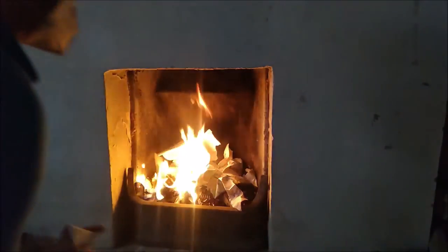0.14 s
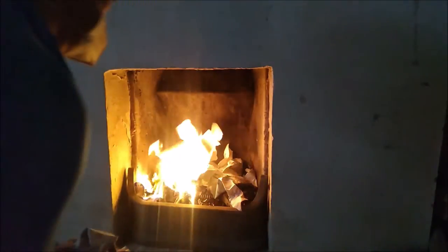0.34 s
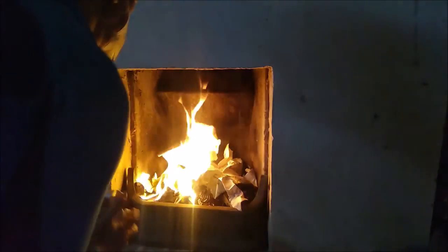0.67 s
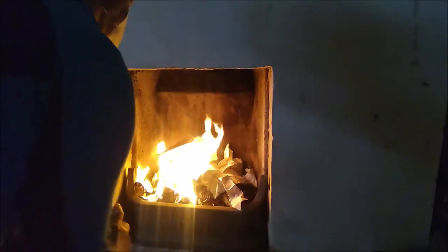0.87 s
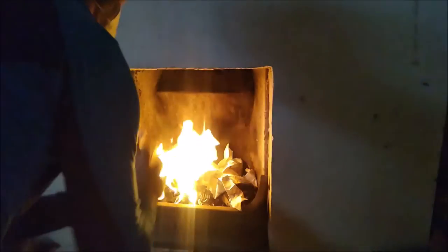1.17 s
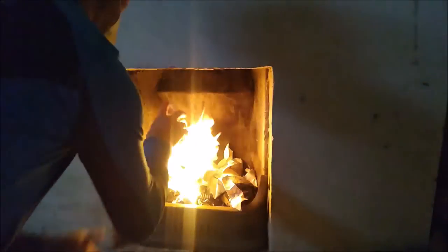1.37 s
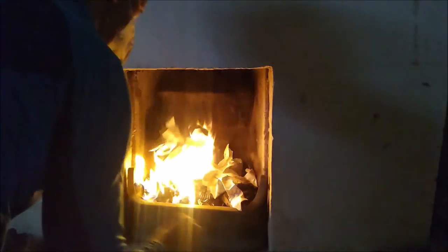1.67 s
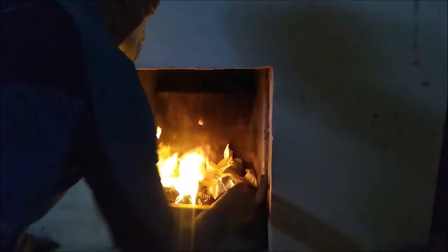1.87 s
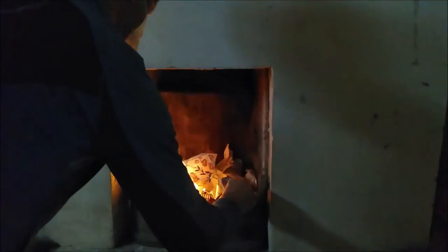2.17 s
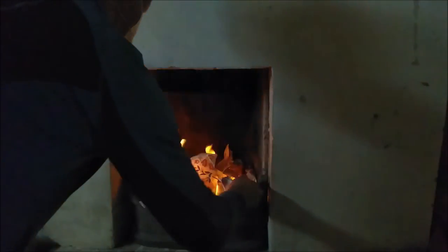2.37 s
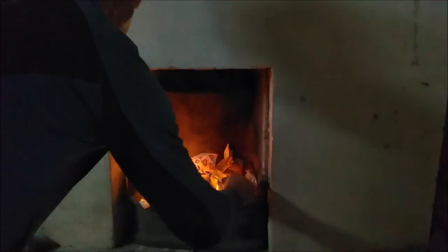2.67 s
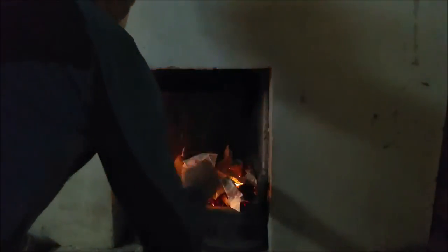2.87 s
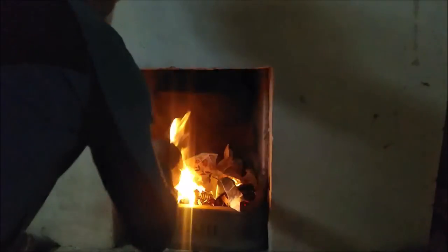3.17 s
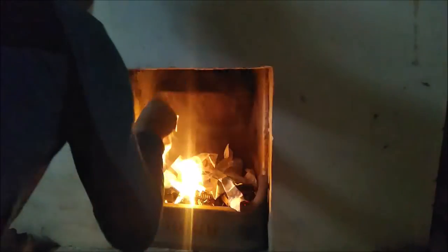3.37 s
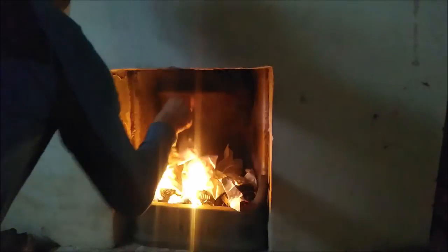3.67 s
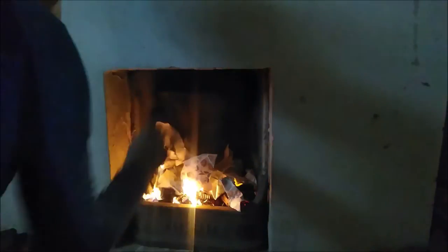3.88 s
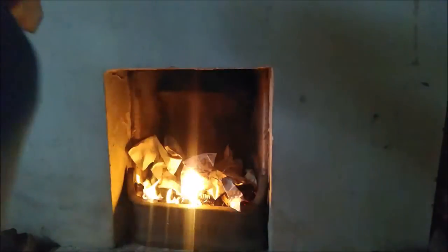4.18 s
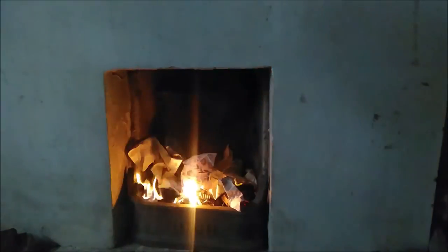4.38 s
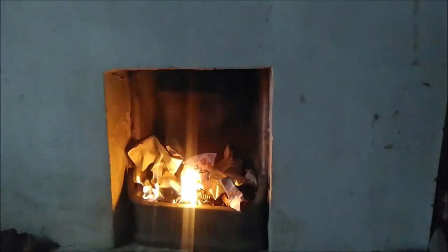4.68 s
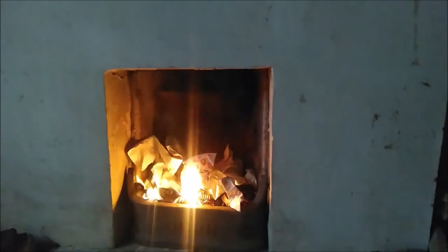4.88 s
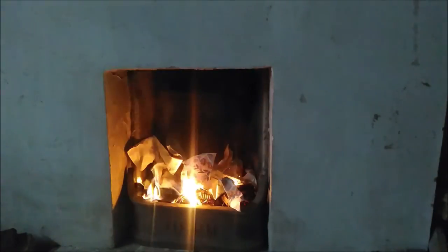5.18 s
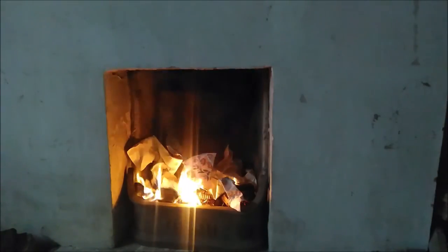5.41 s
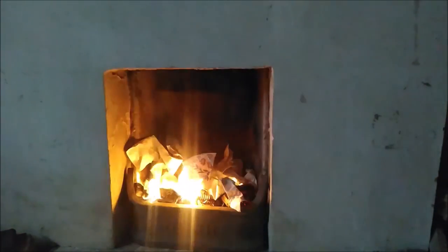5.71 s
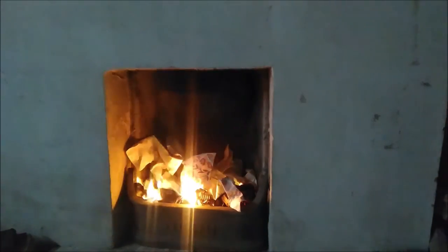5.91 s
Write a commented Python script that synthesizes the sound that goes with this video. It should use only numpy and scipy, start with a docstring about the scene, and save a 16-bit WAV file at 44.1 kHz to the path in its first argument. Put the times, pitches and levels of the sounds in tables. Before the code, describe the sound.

From 0 to about 1.1 s, crumpled paper crinkles loudly and densely in overlapping squeezes, with crisp snaps around 0.1, 0.3, 0.4 and a cluster at 0.65-0.73 s, plus low body shuffling. It then thins; a short crunch and snap come at 1.5 s with a soft thud near 1.6 s. From 1.8 to 2.4 s there are quieter rustles and hollow, low scrapes of the pile. At 2.5 s a hard knock cracks, bounces almost at once, and rings grate and firebox for about half a second. Another drag follows at 2.7 s. Light sleeve swishes and snaps come around 3.2 s, a brief rustle and thud at 3.8 s, tiny snaps near 4.3 s and a soft swish at 4.9 s. After a lull, duller crinkling and soft thuds return from 5.6 s to the end. Faint high hiss, room air and low hum persist; the room echoes briefly.

```python
"""Crumpled paper pushed into a small fireplace

A bare room, one microphone: someone crouches, pushes paper into the burning pile, then steps away.
Paper crinkles in dense clicks and snaps in short noise bursts; one knock rings modes of grate and firebox.
The pile scrapes as narrow noise, sleeves swish in fine clicks, feet thud as decaying sines.
A faint, unsteady high hiss of fine clicks lies under it all, with filtered-noise air and a low hum."""
import sys
import numpy as np
from scipy import signal
from scipy.fft import rfft, irfft, next_fast_len
from scipy.io import wavfile
from scipy.ndimage import map_coordinates

SR = 44100
rng = np.random.default_rng(int(sys.argv[2]) if len(sys.argv) > 2 else 0)


def wav_record(signal):
    """Record a signal, one row per channel, as 16-bit PCM in the file named by sys.argv[1]."""
    frames = np.transpose(np.atleast_2d(signal))
    bounded = np.clip(frames, -1, 1)
    # unit amplitude maps onto the largest positive 16-bit level
    quanta = np.round(bounded * 32767).astype(np.int16)
    wavfile.write(sys.argv[1], SR, quanta)


N = 266805
TIME = np.arange(N) / SR

# squeezes of the paper; treble and low middle are against level_db:
# start_s, rise_s, hold_s, level_db, treble_db, low_middle_db
SQUEEZES = [(0, 0.0017, .035, -43, -0.5, -2.5), (0.065, 0.028, .02, -43, -3.5, 0),
            (.175, 0.12, .03, -41.5, 3, -2.5), (0.374, 0.026, .03, -44, -6, -2),
            (0.428, 0.16, .05, -42, -4.5, -5), (0.597, 0.073, .1, -43, -1, -1),
            (0.79, 0.047, .2, -49, -3.5, -19), (1.038, 0.05, .04, -47.5, -1.5, -14),
            (1.193, 0.074, .08, -60, -21, -43), (1.352, 0.014, .09, -51.5, -3.5, -15),
            (1.5, 0.029, .01, -49, -19, -2), (1.531, 0.0032, 0.012, -43.5, -28, -5),
            (1.66, 0.015, .03, -58, -1.5, -2), (1.774, 0.004, .36, -54.5, 0.5, -6),
            (2.17, 0.0069, 0.0092, -57, 7, -4.5), (2.205, .025, 0.013, -51.5, 2, -3),
            (2.282, .015, .04, -57, -9.5, -4), (2.37, 0.1, .04, -57.5, -1.5, -7),
            (2.808, 0.019, .01, -63.5, -4.5, -16), (3.694, 0.036, .04, -61, 2.5, -25),
            (3.765, 0.016, .05, -49, -2, -5), (3.864, 0.034, .03, -62, 5, 2),
            (3.985, 0.033, 0.029, -82, 15.5, -17), (5.55, .13, 0.069, -56, -11, -15.5),
            (5.677, 0.15, .08, -49.5, -6.5, -6), (5.92, 0.1, .08, -55.5, -4, -10)]
# spectrum of the crinkling paper: frequency_hz, level_db
PAPER_SPECTRUM = [(290, -34), (500, -13), (819, -11.5), (919, -7.5), (1020, -3), (1160, -1.5), (1600, 0),
                  (2770, -1.5), (4940, -3.5), (6330, -6), (12100, -9.5), (15100, -15.5), (16000, -19.5)]
# creases that snap, peak before the echo: start_s, peak_db, treble_db, sheet_pitch_hz
SNAPS = [(0.099, -21, -6, 920), (0.293, -18.5, -3, 1570), (0.404, -26, -3, 1012), (0.639, -22.5, -18, 2310),
         (.659, -24.5, -28, 975), (0.724, -19.5, -38, 1534), (0.729, -20.5, -36, 1190),
         (1.518, -36, -1, 1630), (1.536, -21, -6.5, 1110), (1.778, -37.5, -21, 1290),
         (1.832, -34.5, -3.5, 1190), (3.199, -41.5, 4, 1702), (3.227, -31, 6, 1897),
         (3.772, -32, -7.5, 1240), (3.785, -30.5, -12.5, 2550), (3.898, -33, 6, 2500),
         (4.26, -37, 3.5, 2370), (4.271, -36, -16, 1730), (4.318, -33, -2.5, 1765), (4.337, -38.5, 6, 2034),
         (5.882, -33, -11.5, 1129)]
# spectrum of a snapping crease: frequency_hz, level_db
CREASE_SPECTRUM = [(120, -26), (300, -7.5), (750, -5.5), (1100, -1), (2000, 2.5), (3500, -2), (6000, -3.5),
                   (9000, -5), (15500, -15)]
# contacts of the knock on the grate, against each other: start_s, level_db
KNOCK_CONTACTS = [(2.4961, 2.5), (2.4979, -5.5), (2.5147, -22)]
# spectrum of the knock's crack: frequency_hz, level_db
KNOCK_SPECTRUM = [(35, -41), (60, -24), (110, -26.5), (250, -12), (400, -7.5), (580, -10), (785, -13.5),
                  (1280, -7.5), (1800, -9.5), (2600, -12), (4000, -13), (6200, -11.5), (8000, -19.5),
                  (15500, -27.5)]
# ringing of grate and firebox, levels against each other: pitch_hz, level_db, t60_s
GRATE_MODES = [(137.3, -11.5, 0.82), (169, -11, 0.35), (224.8, 2.5, 0.18), (248.6, 1.5, 0.27),
               (306, -14.5, 0.37), (311, -7, 0.51), (472, -6.5, .33), (550, -8, .27), (590, -4.5, 0.48),
               (1376, -11, 0.14), (1634, -5.5, 0.44), (1900, -10, 0.32), (2020, -5.5, 0.27),
               (2482, -2.5, 0.28), (2990, -13, 0.36)]
# spectrum of the air in the firebox: frequency_hz, level_db
BOOM_SPECTRUM = [(35, -27), (60, -17.5), (100, -15), (130, -9), (250, 6.5), (480, -10), (700, -17.5),
                 (1500, -35.5)]
# shifts of the body and the pile; bass is against level_db: start_s, rise_s, hold_s, level_db, bass_db
SHIFTS = [(0, 0.0024, 0.013, -47.5, 1), (0.058, 0.018, 0.12, -50, -11), (0.262, 0.015, 0.06, -50, -34),
          (0.38, 0.031, 0.028, -47.5, -16), (0.48, 0.016, 0.35, -63.5, -72), (1.13, .03, .02, -66.5, -8),
          (1.358, 0.026, 0.11, -78.5, 14), (1.506, 0.043, 0.047, -59, 2.5),
          (1.763, 0.024, 0.11, -63, -12.5), (2.017, .04, 0.052, -66.5, 2.5),
          (2.176, 0.039, 0.072, -60.5, 6), (2.919, 0.021, 0.0064, -79, 3.5), (3.435, 0.019, 0.009, -90, 22),
          (3.561, 0.091, .06, -86.5, 17), (3.756, 0.036, 0.044, -52, -5), (3.928, 0.015, .02, -64.5, -2),
          (5.658, 0.018, 0.038, -57.5, -7), (5.723, 0.036, 0.19, -58.5, -35)]
# spectrum of the shifting body: frequency_hz, level_db
SHUFFLE_SPECTRUM = [(59, -44.5), (100, -27), (124, -11), (178, -23), (237, -1.5), (321, -6.5), (416, -2.5),
                    (777, -3.5), (860, -12.5), (900, -1.5), (1170, -23.5), (1980, -120)]
# drags of the pile over the grate: start_s, rise_s, hold_s, level_db, hollow_pitch_hz
DRAGS = [(1.78, 0.043, 0.098, -61.5, 398.6), (1.969, 0.1, 0.02, -53, 440), (2.154, 0.046, .03, -50, 470),
         (2.31, 0.12, 0.18, -56.5, 418), (2.712, 0.021, 0.052, -50.5, 377.7),
         (2.9, 0.035, 0.019, -68.5, 322), (3.543, 0.057, .03, -72, 482), (3.686, 0.023, 0.011, -62, 433),
         (3.943, 0.038, 0.012, -61, 382)]
# soft thuds of feet and knees, level before the swell and room: start_s, level_db, pitch_hz, t60_s
THUDS = [(1.585, -39.5, 283.7, 0.21), (1.598, -54, 195, 0.17), (2.19, -49, 529, 0.3),
         (2.225, -41.5, 248, 0.3), (3.80, -39, 404, 0.082), (5.672, -44.5, 225.5, 0.23),
         (5.718, -45.5, 631, 0.16), (5.838, -40.5, 273, 0.21), (5.86, -40.5, 242, 0.15)]
# swishes of sleeves; treble and the ring of the folds are against level_db:
# start_s, rise_s, hold_s, level_db, treble_db, fold_pitch_hz, fold_ring_db
SWISHES = [(3.185, 0.05, 0.026, -61, 2, 1730, 5.5), (3.269, 0.033, 0.017, -50.5, -4.5, 1672, 1),
           (3.366, 0.064, 0.031, -69, -8.5, 1710, -21), (3.483, .03, .09, -78.5, -11, 1690, -18),
           (4.149, 0.022, .02, -80.5, 13, 1553, 4), (4.247, 0.024, 0.01, -59.5, 5, 1670, 7),
           (4.303, 0.022, 0.017, -58.5, -14, 1787, 0), (4.55, 0.21, 0.13, -74, 3, 1997, -0.5),
           (4.878, 0.073, 0.051, -54, -7.5, 1295, -11), (5.071, 0.012, 0.021, -61.5, 2.5, 1996, -8),
           (5.151, .04, .12, -85, -19, 2030, 11)]
# spectrum of sleeve cloth: frequency_hz, level_db
SLEEVE_SPECTRUM = [(600, -29.5), (950, -9.5), (1400, -2.5), (2400, 1), (3000, -1.5), (4300, -1),
                   (6500, -5.5), (11000, -7), (15500, -15.5)]
# spectrum of the faint high hiss: frequency_hz, level_db
HISS_SPECTRUM = [(700, -23), (1500, -0.5), (2200, 1.5), (4200, -4), (6500, -9.5), (11000, -8.5),
                 (15500, -14.5)]
# spectrum of the still room air: frequency_hz, level_db
AIR_SPECTRUM = [(20, -28.5), (35, -18.5), (50, -4.5), (78, -4.5), (110, -17.5), (250, -16), (500, -21),
                (750, -25.5), (1300, -33), (4000, -34.5), (6000, -41.5), (12000, -49.5), (16000, -59)]
# first reflections off firebox, hearth and wall, against the direct sound: mean_delay_s, gain
NEAR_WALLS = [(.0021, 0.23), (.0037, -0.077), (.0058, 0.18), (.0083, -0.054)]
# decay time of the room: frequency_hz, t60_s
ROOM_T60 = [(100, 0.14), (300, 0.55), (700, 0.3), (1500, 0.52), (4000, 0.42), (8000, 0.24), (15000, 0.64)]

# how fast each kind of movement dies away once the push stops
SQUEEZE_FADE_DB_PER_S, SHIFT_FADE_DB_PER_S = 132, 154.5
SWISH_FADE_DB_PER_S, DRAG_FADE_DB_PER_S = 174.5, 150.5
RISE_CURVE = 0.99  # exponent of a movement's rise; 1 is a straight line
CRACKLE_DB, PAPER_GRAIN_DB = -16.5, -15  # stray crackles and tone grains against the dense crinkle
GRAIN_HZ, GRAIN_OCTAVES = 800, 2.7  # lowest pitch of a tone grain and the range above it
# the duller a snap, the more of it is the ring of its sheet
SHEET_RING_DB, RING_PER_TREBLE_DB = 1.5, -1.27
# small sheets and dull snaps carry little bass
SNAP_BASS_DB, BASS_DB_PER_OCTAVE, BASS_PER_TREBLE_DB = -3, -25, 1.5
LARGE_SHEET_HZ = 1000
SWISH_GRAIN_DB = -9  # tone grains against the fine clicks of a swish
FOLD_WIDTH_HZ = 190  # width of the ring of the stiff folds
HISS_DB = -78  # before its slow unsteadiness
AIR_DB = -74.5  # level of the air above 98 Hz
HUM_HZ, HUM_DB = 50, -71
TOP_HZ = 15900


def rustle():
    """Paper fibres buckle in dense tiny clicks and stray crackles, with a grainy tone, squeeze by squeeze."""
    level_db, treble_db, low_db = np.transpose(SQUEEZES)[3:]
    buckles = clicks(rate=2200, spread_db=1.0)
    buckles = buckles + amp(CRACKLE_DB) * clicks(rate=100, spread_db=2.5)
    buckles = buckles + amp(PAPER_GRAIN_DB) * tone_grains(count=1100, ring_s=.006, spread_db=2.0)
    crinkle = room(colour(buckles, PAPER_SPECTRUM), wet_db=-5.5, build_s=.004)
    body, crisp = split(crinkle, hz=5060)
    low, middle = split(body, hz=1330)
    out = np.zeros(N)
    # each squeeze has its own strength and brightness
    for band, band_db in [(low, low_db), (middle, 0), (crisp, treble_db)]:
        out += unit(band) * strokes(SQUEEZES, level_db + band_db, SQUEEZE_FADE_DB_PER_S)
    return out


def snaps():
    """A crease gives way in a burst of a few milliseconds that rings its sheet; large folds sound lower."""
    out, t = np.zeros(N), TIME[:SR // 10]
    buckling = np.exp(-(t / .004) ** 2)
    for start_s, peak_db, treble_db, sheet_hz in SNAPS:
        ring_db = SHEET_RING_DB + RING_PER_TREBLE_DB * treble_db
        octaves = np.log2(sheet_hz / LARGE_SHEET_HZ)
        bass_db = SNAP_BASS_DB + BASS_DB_PER_OCTAVE * octaves + BASS_PER_TREBLE_DB * treble_db
        burst = colour(rng.standard_normal(len(t)) * buckling, CREASE_SPECTRUM)
        bass, upper = split(burst, hz=820)
        middle, treble = split(upper, hz=3680)
        sheet = amp(ring_db) * unit(resonate(middle, sheet_hz, width_hz=200))
        snap = unit(unit(middle) + sheet)
        snap = snap + unit(treble) * amp(treble_db + 5.5) + unit(bass) * amp(bass_db)
        add(out, amp(peak_db) * snap / np.abs(snap).max(), start_s)
    return out + amp(-3.0) * reflections(out, build_s=0.0017)


def knock():
    """A hard blow with quick after-contacts: a broad crack, a boom in the firebox and the ring of the grate."""
    t = TIME[:SR]
    crack, body = np.zeros(N), np.zeros(N)
    for start_s, level_db in KNOCK_CONTACTS:
        direct = unit(rng.standard_normal(SR) * np.exp(-t / .0034))
        # each contact sends a sharp pulse to the walls, which soak up its very top
        dull, bright = split(reflections(signal.unit_impulse(SR), build_s=0.0027), hz=7560)
        echo = unit(dull + amp(-9.0) * bright)
        add(crack, amp(level_db) * (direct + amp(-1.5) * echo), start_s)
    ring = np.zeros(SR)
    for hz, level_db, t60 in GRATE_MODES:
        mode = np.sin(2 * np.pi * hz * t) * np.exp(-np.log(1000) * t / t60)
        ring += amp(level_db) * mode * rng.choice([-1, 1])
    boom = colour(rng.standard_normal(SR), BOOM_SPECTRUM) * np.exp(-np.log(1000) * t / 0.51)
    # the heavy parts take some milliseconds to get going
    onset = 1 - np.exp(-t / 0.0047)
    add(body, (amp(-37.0) * unit(ring) + amp(-38.5) * unit(boom)) * onset, KNOCK_CONTACTS[0][0])
    return amp(-40.0) * unit(colour(crack, KNOCK_SPECTRUM)) + body


def shuffle():
    """Cloth and the paper pile slip in small jerks, heard mostly through the firebox and the room."""
    level_db, bass_db = np.transpose(SHIFTS)[3:]
    slips = room(colour(clicks(rate=700, spread_db=1.5), SHUFFLE_SPECTRUM), wet_db=4, build_s=.005)
    bass, upper = split(slips, hz=278)
    deep = unit(bass) * strokes(SHIFTS, level_db + bass_db, SHIFT_FADE_DB_PER_S)
    return deep + unit(upper) * strokes(SHIFTS, level_db, SHIFT_FADE_DB_PER_S)


def scrape():
    """The pile drags over the grate and stirs the hollow of the firebox."""
    out = np.zeros(N)
    for start_s, rise_s, hold_s, level_db, hz in DRAGS:
        drag = stroke(start_s, rise_s, hold_s, DRAG_FADE_DB_PER_S)
        out += amp(level_db) * drag * narrow(hz, width_hz=110)
    return out


def thuds():
    """Soft contacts of feet and knees each excite one short low resonance."""
    out, t = np.zeros(N), TIME[:SR // 2]
    for start_s, level_db, hz, t60 in THUDS:
        swell = (1 - np.exp(-t / 0.0011)) * np.exp(-np.log(1000) * t / t60)
        add(out, amp(level_db) * swell * np.sin(2 * np.pi * hz * t), start_s)
    return room(out, wet_db=-12.5, build_s=.01)


def swish():
    """Threads catch and slip in fine clicks, and the stiff folds ring with them."""
    slips = clicks(rate=3000, spread_db=1.0)
    # a negative spread makes the grains more often strong than weak
    slips = slips + amp(SWISH_GRAIN_DB) * tone_grains(count=1200, ring_s=0.019, spread_db=-3.5)
    threads = room(colour(slips, SLEEVE_SPECTRUM), wet_db=-5.0, build_s=0.00072)
    body, crisp = map(unit, split(threads, hz=4620))
    out = np.zeros(N)
    for start_s, rise_s, hold_s, level_db, treble_db, fold_hz, fold_db in SWISHES:
        cloth = body + amp(treble_db) * crisp + amp(fold_db) * narrow(fold_hz, FOLD_WIDTH_HZ)
        out += amp(level_db) * stroke(start_s, rise_s, hold_s, SWISH_FADE_DB_PER_S) * cloth
    return out


def hiss(unsteady_db=-0.5):
    """A faint, unsteady high hiss of fine clicks under everything."""
    fine = clicks(rate=4500, spread_db=3.5)
    fine = fine + amp(-2) * tone_grains(count=600, ring_s=.014, spread_db=4.0)
    drift = amp(unsteady_db * wander(low_hz=0.99, high_hz=9))
    echoed = room(colour(fine, HISS_SPECTRUM), wet_db=-0.5, build_s=.004)
    return amp(HISS_DB) * drift * unit(echoed)


def background():
    """Still room air as coloured noise, and a low hum whose phase wavers slightly."""
    air = colour(rng.standard_normal(N), AIR_SPECTRUM)
    air = air / np.std(split(air, hz=98)[1])
    waver = unit(colour(rng.standard_normal(N), [(2, 0), (8, -20), (30, -80)]))
    hum = unit(np.sin(2 * np.pi * HUM_HZ * TIME + .12 * waver))
    return amp(AIR_DB) * air + amp(HUM_DB) * hum


def room(x, wet_db, build_s):
    """Direct sound, near walls whose distance shifts as the hands move, then diffuse reflections."""
    early = x
    for delay_s, gain in NEAR_WALLS:
        path_s = delay_s + .00015 * wander(low_hz=.3, high_hz=3)
        early = early + gain * map_coordinates(x, [(TIME - path_s) * SR], order=2)
    early = early / np.sqrt(1 + sum(gain ** 2 for _, gain in NEAR_WALLS))
    return early + amp(wet_db) * reflections(early, build_s)


def reflections(x, build_s):
    """Diffuse echoes that build up, then die away in each octave at the room's own rate."""
    t = TIME[:SR]
    rest, tail = rng.standard_normal(SR), 0
    for hz in 125 * 2 ** np.arange(8):
        band, rest = split(rest, hz * np.sqrt(2))
        tail = tail + band * amp(-60 * t / on_log(hz, ROOM_T60))
    tail = tail * (1 - np.exp(-t / build_s))
    return signal.fftconvolve(x, tail / np.linalg.norm(tail))[:len(x)]


def clicks(rate, spread_db, jerk_db=1.5):
    """Random clicks (rate per second), most of them near the smallest size, that come in uneven jerks."""
    size = amp(spread_db * np.minimum(rng.exponential(size=N), 5))
    jerks = wander(low_hz=8, high_hz=35)
    return unit((rng.random(N) < rate / SR) * rng.choice([-1, 1], N) * size * amp(jerk_db * jerks))


def tone_grains(count, ring_s, spread_db):
    """Short decaying sines at random moments and pitches, which give the noise a grainy tone."""
    out, t = np.zeros(N), TIME[:SR // 16]
    decay = np.exp(-t / ring_s)
    for when, pitch, size in rng.random((count, 3)):
        hz = min(GRAIN_HZ * 2 ** (GRAIN_OCTAVES * pitch), .45 * SR)
        strength = np.sqrt(hz) * amp(spread_db * min(-np.log(1 - size), 4))
        add(out, strength * decay * np.sin(2 * np.pi * hz * t), when * TIME[-1])
    return unit(out)


def narrow(hz, width_hz):
    """A resonance stirred by friction: slow noise carried on a sine and a cosine."""
    lowpass = signal.butter(2, width_hz / 2, fs=SR, output="sos")
    sway = signal.sosfilt(lowpass, rng.standard_normal((2, N)))
    phase = 2 * np.pi * hz * TIME
    return unit(sway[0] * np.cos(phase) + sway[1] * np.sin(phase))


def resonate(x, hz, width_hz):
    """One resonance, gain 1 at its centre."""
    hz = min(hz, .45 * SR)
    return signal.lfilter(*signal.iirpeak(hz, hz / width_hz, fs=SR), x)


def stroke(start_s, rise_s, hold_s, fade_db_per_s):
    """One movement: it gathers speed, keeps it, then dies away."""
    t = TIME - start_s
    rise = np.clip(t / max(rise_s, 1 / SR), 0, 1) ** RISE_CURVE
    return rise * amp(-fade_db_per_s * np.maximum(t - rise_s - hold_s, 0))


def strokes(table, levels_db, fade_db_per_s):
    """Joint strength of overlapping movements, which add in power."""
    power = np.zeros(N)
    for row, level_db in zip(table, levels_db):
        power += (amp(level_db) * stroke(*row[:3], fade_db_per_s)) ** 2
    return np.sqrt(power)


def wander(low_hz, high_hz):
    """Slow random motion with a spread of 1."""
    hz = np.fft.rfftfreq(N, 1 / SR)
    return unit(irfft(rfft(rng.standard_normal(N)) * ((hz > low_hz) & (hz < high_hz)), N))


def colour(x, spectrum):
    """Causal (minimum-phase) filter with the given (Hz, dB) spectrum."""
    size = next_fast_len(len(x) + 4096)
    size += size % 2
    cepstrum = irfft(np.log(amp(on_log(np.fft.rfftfreq(size, 1 / SR), spectrum))))
    # folding the cepstrum forward in time makes the filter causal
    cepstrum[1:size // 2] *= 2
    cepstrum[size // 2 + 1:] = 0
    return irfft(rfft(x, size) * np.exp(rfft(cepstrum)))[:len(x)]


def split(x, hz):
    """The parts below and above a crossover frequency."""
    hz = min(hz, .45 * SR)
    low = signal.butter(2, hz, "low", fs=SR, output="sos")
    high = signal.butter(2, hz, "high", fs=SR, output="sos")
    # each filter runs twice for a steeper crossover
    return signal.sosfilt(np.vstack([low, low]), x), signal.sosfilt(np.vstack([high, high]), x)


def on_log(hz, points):
    """Read (Hz, value) points along a log-frequency axis."""
    at, value = np.transpose(points)
    return np.interp(np.log(np.maximum(hz, 1)), np.log(at), value)


def amp(db):
    """Decibels to gain."""
    return 10 ** (np.asarray(db) / 20)


def unit(x):
    """Scale to an rms of 1."""
    return x / np.sqrt(np.mean(x ** 2))


def add(out, x, start_s):
    """Mix x into out from time start_s."""
    start = max(int(start_s * SR), 0)
    out[start:start + len(x)] += x[:N - start]


def scene():
    """All sources at one microphone."""
    paper = rustle() + snaps()
    hearth = knock() + scrape()
    person = shuffle() + thuds() + swish()
    return (paper + hearth + person + hiss() + background())[None]


def record(dry):
    """The recorder cuts the top with a steep low-pass."""
    return signal.sosfilt(signal.ellip(10, .2, 70, TOP_HZ, fs=SR, output="sos"), dry)


dry = scene()
out = record(dry)
wav_record(out)
```